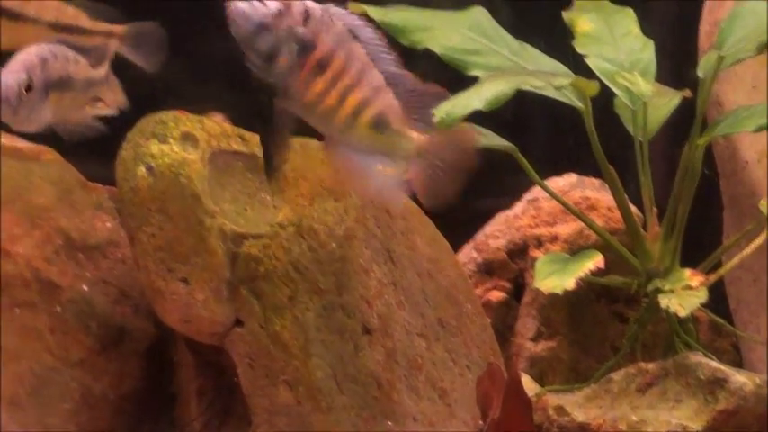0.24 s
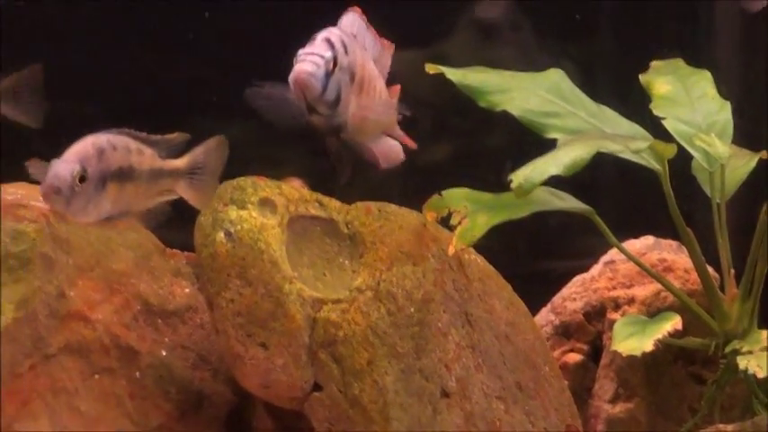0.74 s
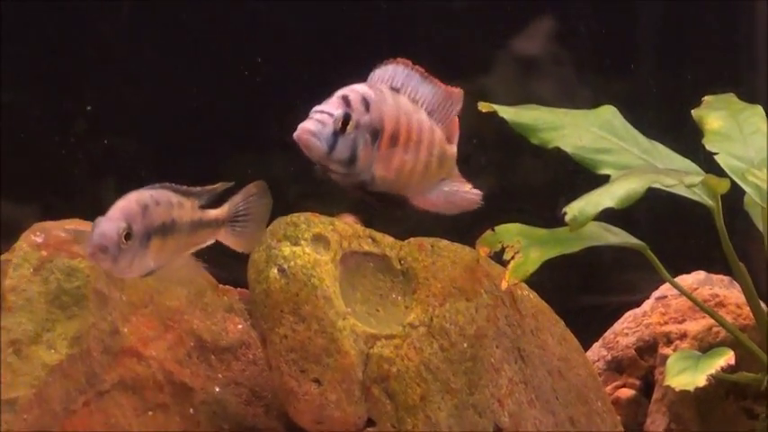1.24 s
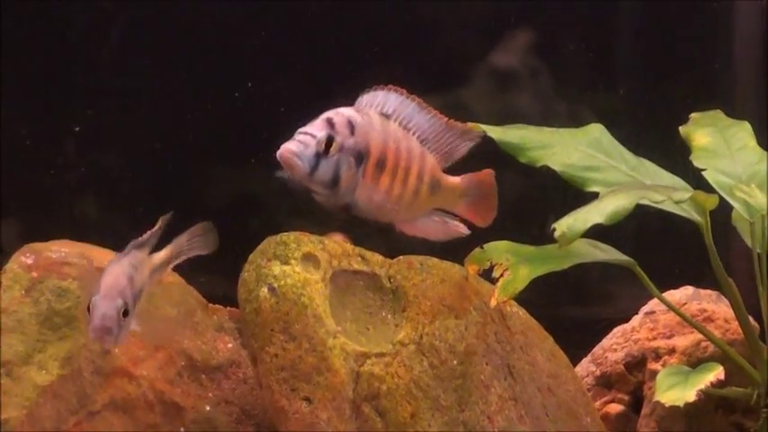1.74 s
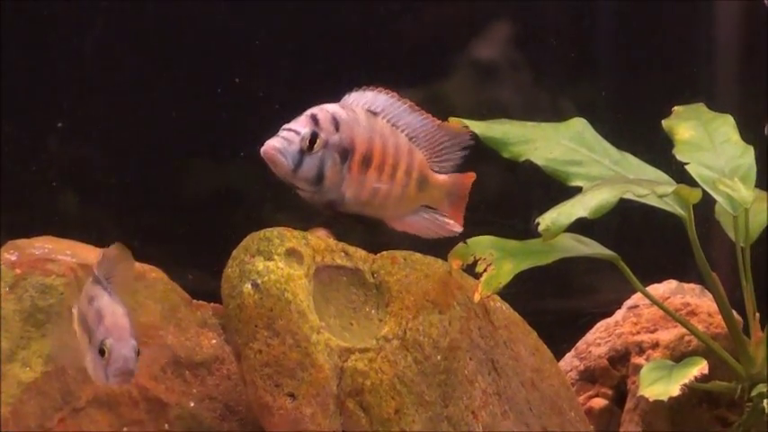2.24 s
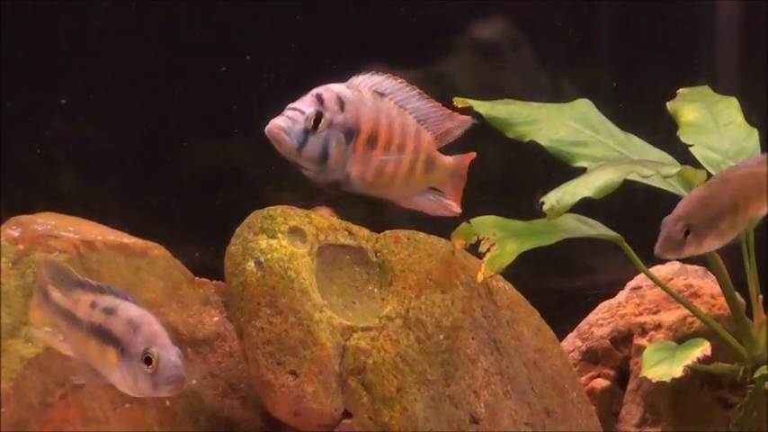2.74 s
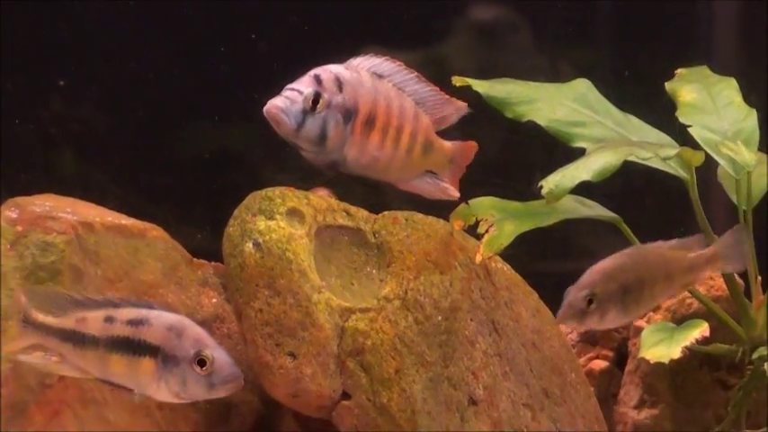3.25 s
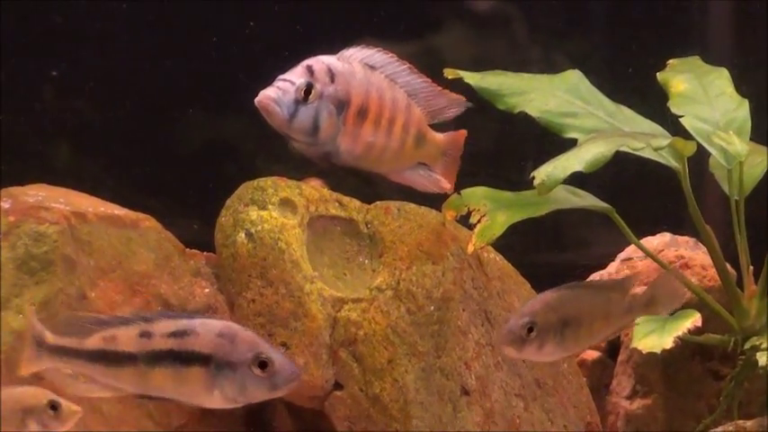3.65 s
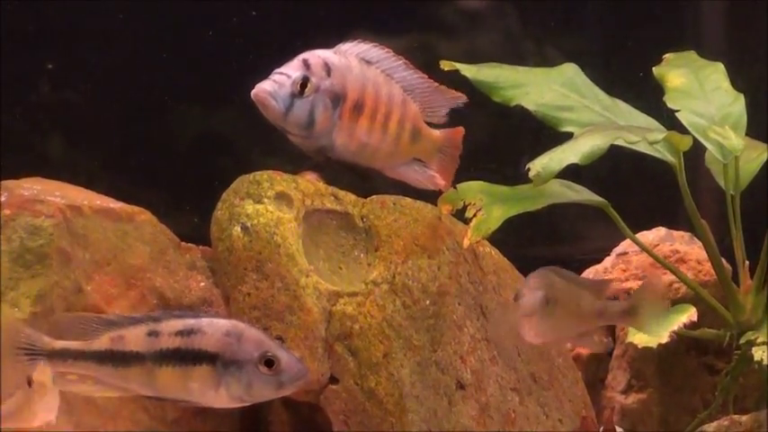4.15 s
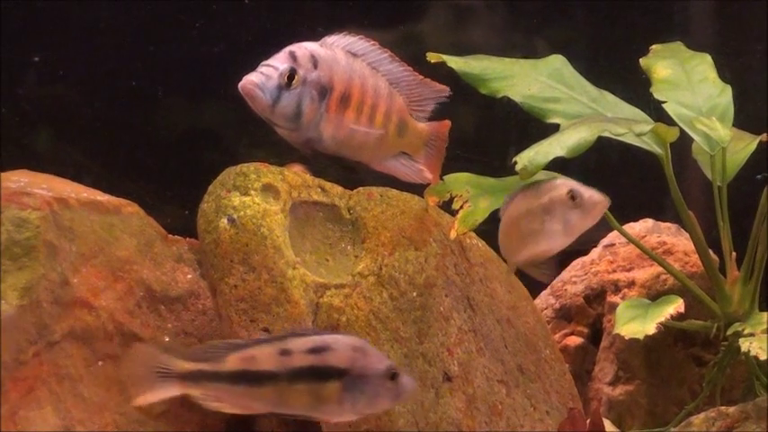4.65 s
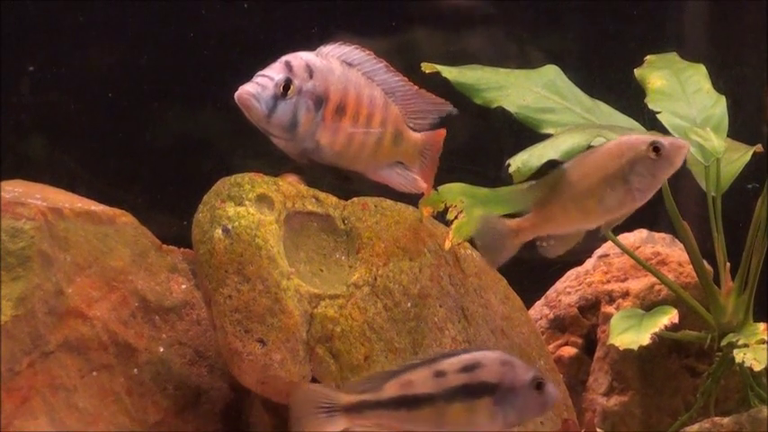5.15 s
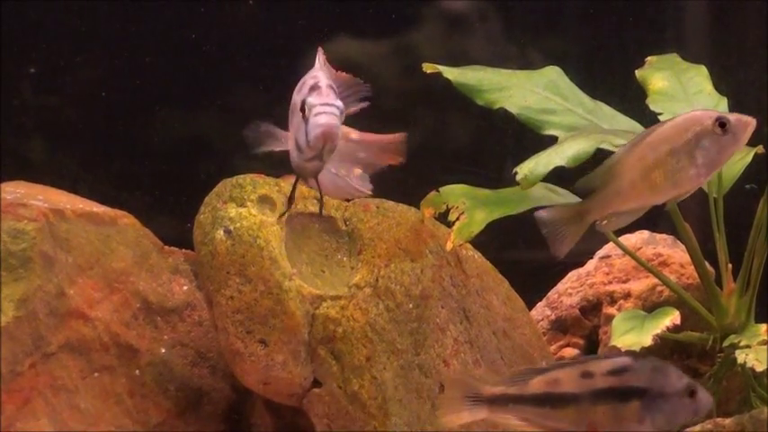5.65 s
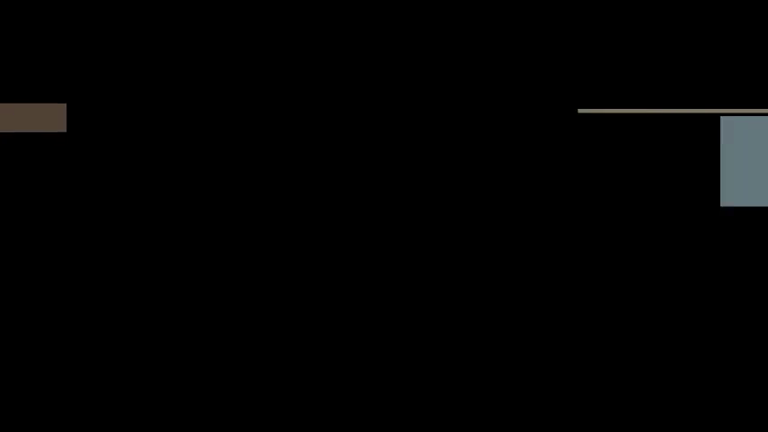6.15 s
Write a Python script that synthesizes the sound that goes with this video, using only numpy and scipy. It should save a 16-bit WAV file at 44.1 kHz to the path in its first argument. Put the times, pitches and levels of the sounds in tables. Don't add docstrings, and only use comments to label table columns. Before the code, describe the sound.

Aquarium filter water rushes and hisses steadily, with low gurgling bubbles, a hollow pipe ring, pump hum and thin motor whine, then stops dead.

```python
import sys
import numpy as np
from scipy import signal
from scipy.fft import rfft, irfft, next_fast_len
from scipy.io import wavfile
from scipy.ndimage import uniform_filter1d

SR = 44100
rng = np.random.default_rng(int(sys.argv[2]) if len(sys.argv) > 2 else 0)


def invert_db(level):
    return 10 ** (np.asarray(level, dtype=float) / 20)


def unload_wav(signal):
    wavfile.write(
        sys.argv[1],
        SR,
        np.round(np.clip(np.atleast_2d(signal).T, -1, 1) * 32767).astype(np.int16),
    )


N = 282098
TIME_S = np.arange(N) / SR
END_S = 5.8695

# frequency in Hz, level in dB.
SIDE_DB = [(40, -23.5), (130, -37), (300, -24), (600, -20.5), (1000, -16), (1500, -14), (2200, -14.5),
           (2700, -10), (3600, -15.5), (4500, -11.5), (8000, -11), (15000, -8)]
# frequency in Hz, difference in dB.
LEAN_DB = [(60, -1.5), (300, 0.56), (700, -.6), (950, -0.5), (1110, -3), (1300, -1.2), (2400, -.5),
           (5000, -1), (9000, -0.5), (15000, 0)]
# frequency in Hz, phase by which left leads in radians.
PORT_LEAD_RAD = [(100, 0), (300, -.16), (750, -.3), (1100, -.25), (1500, -.1), (2300, -.05), (2600, .25),
                 (3000, 0), (4000, .1), (6500, .33), (9000, .15), (11000, 0)]
# frequency in Hz, density in dB per Hz.
RUSH_SPECTRUM = [(18, -58), (30, -35.5), (86, -20), (147, -2.5), (298, -1.5), (519, -1.5), (710, -0.5),
                 (871, -5), (973, -4.5), (1090, -2.5), (1310, -11.5), (1660, -12.5), (1830, -16),
                 (2360, -21), (2500, -25.5), (3250, -42.5), (5500, -120)]
# frequency in Hz, density in dB per Hz.
HISS_SPECTRUM = [(700, -28.5), (1300, -0.5), (2000, -1), (3000, -2), (4000, -2), (5500, -0.5), (7500, -0.5),
                 (9000, -4), (11000, -12.5), (13000, -17), (15000, -18.5), (16000, -21)]
PIPE_HZ = [1013, 1051, 1078, 1122, 1168, 1095, 1632]
# width in Hz, level in dB.
PIPE_WIDTH_LEVEL = [(10, -8), (13, -1.5), (18.06, -3.5), (12.9, 1), (16, -9), (120, -0.5), (30, -14.5)]
# pitch in Hz, width in Hz, rms level in dB.
TANK_MODES = [(150.2, 25, -37.5), (215.6, 55, -35), (264.4, 120, -31), (308.6, 40, -35.5), (381.5, 11, -40),
              (413, 7.4, -39.5)]
# time in seconds, level in dB.
AIR_DRAWN = [(0, -20), (.15, -25.5), (.3, -19.5), (.55, -27), (.85, -27.5), (1.08, -23.5), (1.82, -30),
             (1.9, -23.5), (2.2, -22), (2.26, -32.5), (2.38, -22), (3.21, -26.5), (3.33, -20.5),
             (3.49, -29.5), (3.7, -21.5), (4.1, -27.5), (4.5, -22.5), (5.7, -25)]
# pitch in Hz, width in Hz, rms level in dB.
PUMP_BODY = [
    (61.3, 6, -53),
    (83.3, 8, -54.5),
    (727.5, 62, -40.5),
]
STEADY_HZ = [57.9, 63.3, 119.8, 1387.5, 1636.5, 2080.6, 2577.3, 2609.6, 2683.6, 2728, 2767, 3107.5, 3390,
             7533.9, 7922.9, 7967.3, 8391.2]
# rms level in dB, left over right in dB.
STEADY_LEVEL_LEAN = [(-61, 0), (-65, 2), (-52.5, 2.5), (-46, 2.5), (-45, -2), (-51, 0.5), (-48.5, -4),
                     (-64.5, -2), (-53.5, -2.5), (-56.5, 0), (-54.5, -1), (-58, -1.5), (-56, 3), (-59, 0),
                     (-57.5, 0), (-59.5, 0.5), (-57, 1.5)]
# time in seconds, pitch in Hz, rms level in dB.
GULPS = [(.102, 138.6, -30.5), (.303, 248, -26), (0.323, 322, -23), (.406, 328, -24.5), (.414, 260, -25),
         (1.875, 240, -33), (1.93, 345, -34), (1.966, 294, -24), (1.986, 225, -24.5), (2.562, 328, -21),
         (2.737, 316, -21.5), (2.84, 131, -35.5), (3.307, 352, -25), (3.538, 221, -17.5), (3.589, 235, -24),
         (3.663, 205, -25.5), (3.877, 213, -29.5), (4.15, 251, -24), (4.191, 182, -24.5),
         (4.439, 144, -28.5), (4.474, 215, -22), (5.48, 309, -21.5), (5.559, 144, -28.5)]
# time in seconds, pitch in Hz, rms level in dB, length in seconds.
SINGS = [(.788, 408.5, -24, 0.12), (2.086, 379, -28.5, 0.14), (2.45, 383, -29.5, 0.21),
         (2.754, 416, -25, 0.099), (2.889, 406.5, -26, 0.13), (3.336, 423, -27, .065),
         (3.722, 390, -26, 0.13), (4.609, 372, -24, 0.078), (5.008, 372, -26.5, 0.077),
         (5.227, 412, -23, 0.062)]
# time in seconds, pitch in Hz, rms level in dB.
BUBBLES = [(.419, 1900, -39), (.438, 970, -26.5), (.691, 1540, -38.5), (.792, 973, -30), (1.939, 1700, -34),
           (1.943, 448, -30), (2.544, 547, -31), (2.805, 1300, -30.5), (3.027, 547, -29), (3.37, 786, -33),
           (3.376, 870, -27.5), (3.525, 510, -29), (3.548, 2010, -35.5), (3.814, 1450, -40),
           (3.994, 521, -24.5), (4.065, 583, -27.5), (5.785, 538, -27.5)]
# time in seconds, length in seconds, pitch in Hz, width in Hz, rms level in dB.
SPLASHES = [
    (0.421, 0.054, 1840, 200, -33),
    (1.22, .04, 1850, 250, -36),
    (1.548, .06, 712, 49.9, -32.5),
    (1.929, 0.15, 280, 178.5, -24),
    (3.25, .05, 3620, 250, -34.5),
    (4.0, 0.067, 1410, 300, -34),
    (4.45, 0.062, 177, 70, -25),
]


def rms_one(x):
    return x / np.sqrt(np.mean(x ** 2) + 1e-20)


def at_hz(points, hz):
    points_hz, value = np.transpose(points)
    return np.interp(np.log(hz), np.log(points_hz), value)


def drift(rate_hz):
    r = np.exp(-2 * np.pi * rate_hz * 40 / SR)
    noise = rng.standard_normal(N // 40 + 2002)
    slow = signal.lfilter([1], [1, -2 * r, r * r], noise)[2000:]
    return np.interp(np.arange(N) / 40, np.arange(len(slow)), rms_one(slow - slow.mean()))


def pair(mid, side, lean_db):
    return np.array([(mid + side) * invert_db(lean_db / 2), (mid - side) * invert_db(-lean_db / 2)])


def spread(mid, side, hz):
    return pair(mid, side * invert_db(at_hz(SIDE_DB, hz)), at_hz(LEAN_DB, hz))


def coloured(spectrum, patchy_db, rate_hz):
    size = next_fast_len(N)
    hz = np.arange(1, size // 2 + 2) * SR / size
    mid, side = rfft(rng.standard_normal((2, size))) * invert_db(at_hz(spectrum, hz))
    both = spread(mid, side, hz)
    half_octave = np.clip(2 * np.log2(hz / 40), 0, 18)
    ends_hz = np.array(spectrum)[[0, -1], 0]
    first, stop = (2 * np.log2(ends_hz / 40) + [0, 2]).clip(0, 19).astype(int)
    out = 0
    for k in range(first, stop):
        share = np.cos(np.pi / 2 * np.clip(half_octave - k, -1, 1)) ** 2
        out = out + irfft(both * share, size)[:, :N] * invert_db(patchy_db * drift(rate_hz))
    return rms_one(out)


def resonances(modes, patchy_db, rate_hz):
    out = 0
    settle = SR // 4
    for hz, width_hz, db in modes:
        r = np.exp(-np.pi * max(width_hz, 1) / SR)
        poles = [1, -2 * r * np.cos(2 * np.pi * hz / SR), r * r]
        noise = rng.standard_normal((2, N + settle))
        for _ in range(2):
            noise = signal.lfilter([1, 0, -1], poles, noise)
        mid, side = rms_one(noise[:, settle:]) * invert_db(db + patchy_db * drift(rate_hz))
        out = out + spread(mid, side, hz)
    return out


def sine(hz, wander_rad):
    return np.sqrt(2) * np.sin(2 * np.pi * (hz * TIME_S + rng.random()) + wander_rad * drift(3.3))


def water_rush():
    return invert_db(-24 + 1.28 * drift(3.7)) * coloured(RUSH_SPECTRUM, patchy_db=0.4, rate_hz=6.1)


def spray_hiss():
    return invert_db(-26.5 + 0.14 * drift(5)) * coloured(HISS_SPECTRUM, patchy_db=0.3, rate_hz=25.0)


def outlet_pipe():
    modes = np.column_stack([PIPE_HZ, PIPE_WIDTH_LEVEL])
    ring = invert_db(-28) * rms_one(resonances(modes, patchy_db=1.8, rate_hz=19.0))
    local_power = uniform_filter1d(np.mean(ring ** 2, axis=0), size=2000)
    ring *= (np.mean(ring ** 2) / local_power) ** .3
    whistle = invert_db(-39 + 2.2 * drift(1.5)) * sine(PIPE_HZ[3], wander_rad=0.97)
    return ring + pair(whistle, 0, -3.5)


def tank_gurgle():
    gurgle_db = np.interp(TIME_S, *np.transpose(AIR_DRAWN))
    return invert_db(gurgle_db - 3.5) * rms_one(resonances(TANK_MODES, patchy_db=2.0, rate_hz=6.0))


def pump_body():
    return resonances(PUMP_BODY, patchy_db=-1.5, rate_hz=3.0)


def steady_tones():
    out = 0
    for hz, (db, lean_db) in zip(STEADY_HZ, STEADY_LEVEL_LEAN):
        out = out + pair(invert_db(db) * sine(hz, wander_rad=0.18), 0, lean_db)
    return out


def heard(swinging, resting, turned):
    settling = np.interp(TIME_S, [.45, 1.5], [swinging, resting])
    return np.where(TIME_S > 2.4, turned, settling)


def motor_whine():
    tooth_hz, gear_hz, top_hz, turn_hz = 2601.1, 2824.9, 6126.2, 57.9
    tooth_lean_db = heard(-3.5, -5, -9.5)
    tooth_db = heard(-37.5, -40.5, -43) + drift(.6)
    octave_db = heard(-44.5, -39.5, -39)
    gear_db = heard(-42.5, -46.5, -51.5) + drift(.6)
    top_db = heard(-38.5, -42, -47) + drift(.6)

    tooth = sine(tooth_hz, 0.14)
    tooth += invert_db(-12.5) * sine(tooth_hz - turn_hz, 0.41)
    tooth += invert_db(-19.0) * sine(tooth_hz + turn_hz, .3)
    tooth += invert_db(-18.0) * sine(tooth_hz + 2 * turn_hz, .3)
    octave = sine(2 * tooth_hz, 0.3)
    octave += invert_db(-22.0) * sine(2 * tooth_hz + turn_hz, 0.41)
    octave += invert_db(-16) * sine(2 * tooth_hz + 2 * turn_hz, .5)
    gear = sine(gear_hz, 0.19)
    top = sine(top_hz, 0.49) + invert_db(-11) * sine(top_hz + 2 * turn_hz, 0.44)

    out = pair(invert_db(tooth_db + 2) * tooth, 0, tooth_lean_db)
    out += pair(invert_db(octave_db + 4) * octave, 0, -1.2)
    out += pair(invert_db(gear_db + 1.0) * gear, 0, -2.1)
    return out + pair(invert_db(top_db - 3.0) * top, 0, -.8)


def air_pockets():
    rise, gain_db = 0.057, 3.5
    rows = list(SINGS)
    for k in range(3):
        rows.append((1.533 + k * .035, 697 + k * 21, -14 - k * 7.55, .01 * (1 + k / 2)))
    rows += [(s, hz, db, 10.0 / hz) for s, hz, db in GULPS]
    rows += [(s, hz, db, 0.051) for s, hz, db in BUBBLES]
    out = np.zeros((2, N))
    for s, hz, db, length_s in rows:
        turn, lean = rng.random(2)
        t = np.arange(-1.5 * length_s * SR, 1.5 * length_s * SR) / SR
        at = max(round(s * SR + t[0] * SR), 0)
        tone = np.sin(2 * np.pi * (hz * (t + rise * t * t / length_s / 2) + turn))
        swell = np.exp(-4.0 * (t / length_s / np.where(t < 0, .8, 1.2)) ** 2)
        out[:, at:at + len(t)] += pair(invert_db(db + gain_db) * swell * tone, 0, 2.5 * (lean - .5))
    return out


def splashes():
    out = 0
    for s, length_s, *band in SPLASHES:
        puff = np.exp(-4 * ((TIME_S - s) / length_s) ** 2)
        out = out + puff * resonances([band], patchy_db=-0.5, rate_hz=1)
    return out


def scene():
    water = water_rush() + spray_hiss() + outlet_pipe() + tank_gurgle()
    machine = pump_body() + steady_tones() + motor_whine()
    return water + machine + air_pockets() + splashes()


def band_limit(x):
    return signal.sosfilt(signal.butter(12, 16700, fs=SR, output="sos"), x)


def record(dry):
    high_pass = signal.butter(6, 9900, "high", fs=SR, output="sos")
    side = signal.sosfiltfilt(high_pass, dry[0] - dry[1]) / 2
    burst = np.clip(1.2 * (drift(10) - .2), 0, 1)
    wide = dry + (invert_db(10 * burst - 10) - 1) * side * [[1], [-1]]
    size = next_fast_len(N)
    hz = np.arange(1, size // 2 + 2) * SR / size
    ports = np.exp(.5j * at_hz(PORT_LEAD_RAD, hz) * [[1], [-1]]) * (hz < 15760)
    stopped = wide * (np.arange(N) < END_S * SR)
    mix = irfft(rfft(stopped, size) * ports, size)[:, :N]
    mix = mix * (np.arange(N) < (END_S + .004) * SR)
    return band_limit(mix)


dry = scene()
out = record(dry)
unload_wav(out)
```